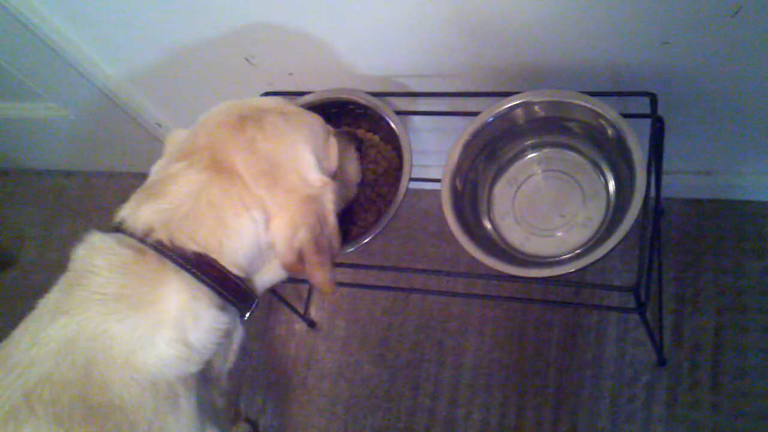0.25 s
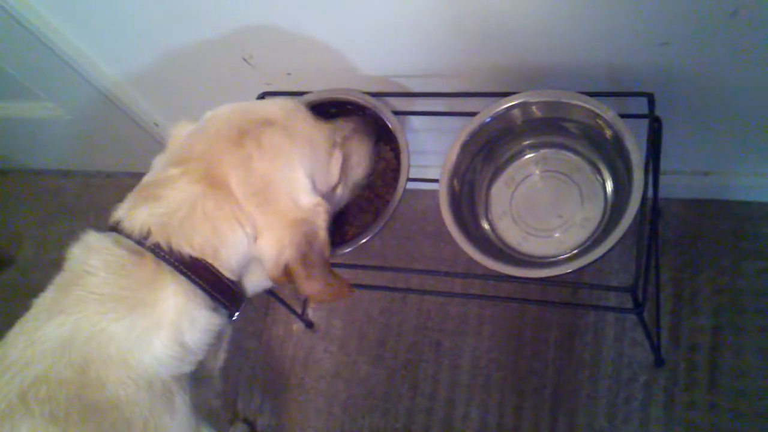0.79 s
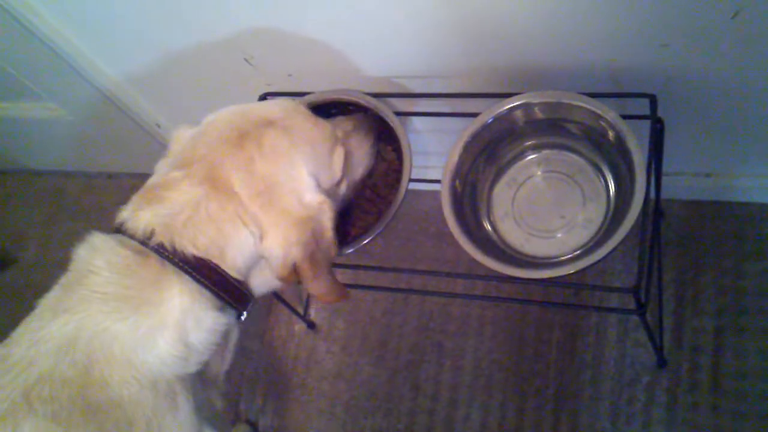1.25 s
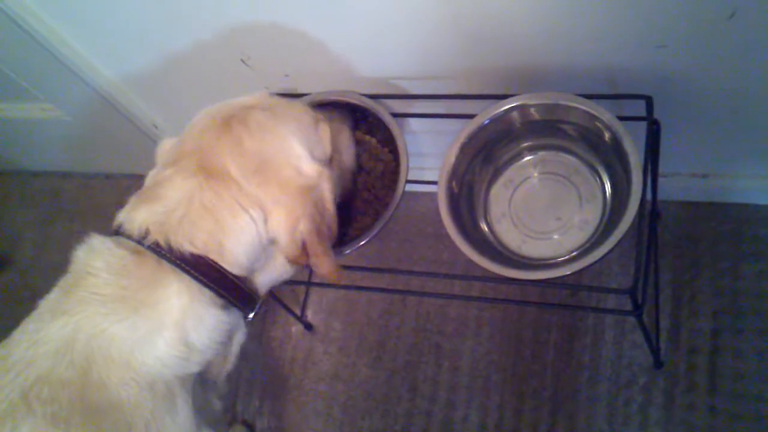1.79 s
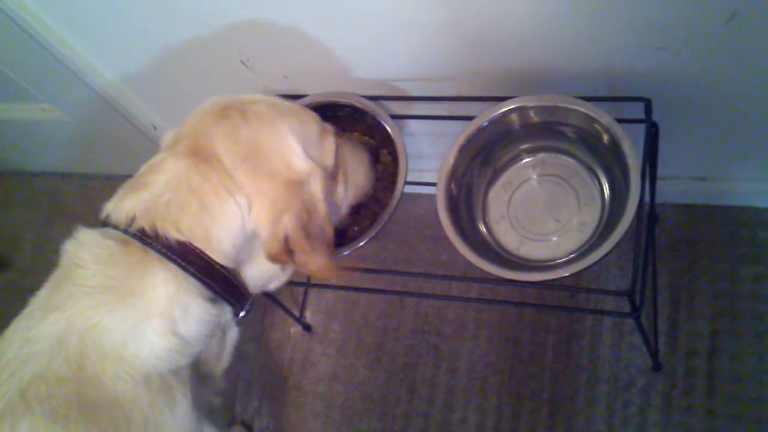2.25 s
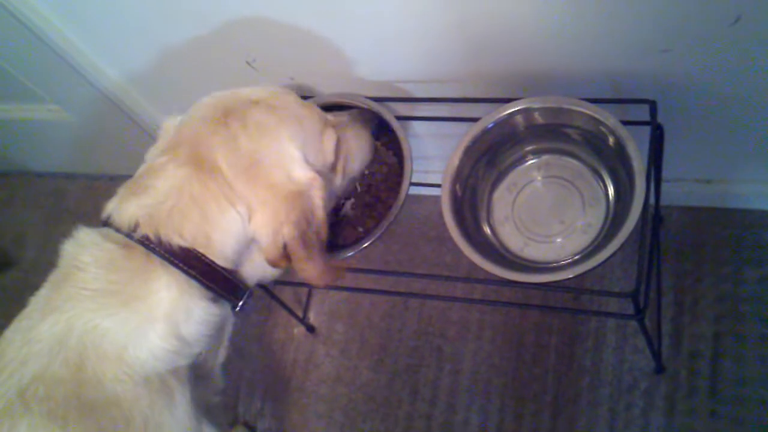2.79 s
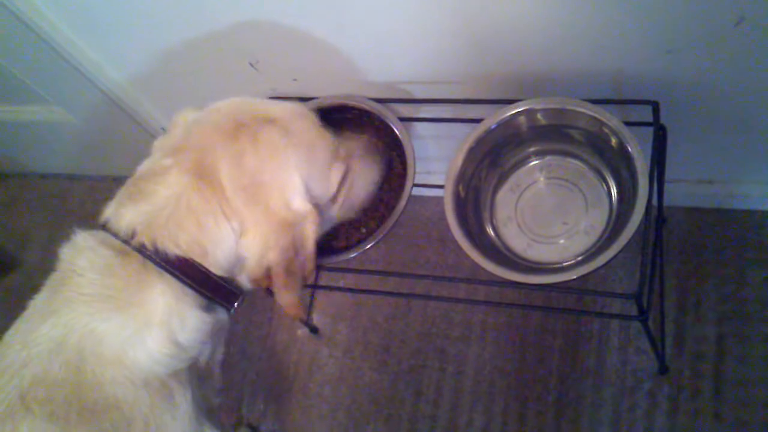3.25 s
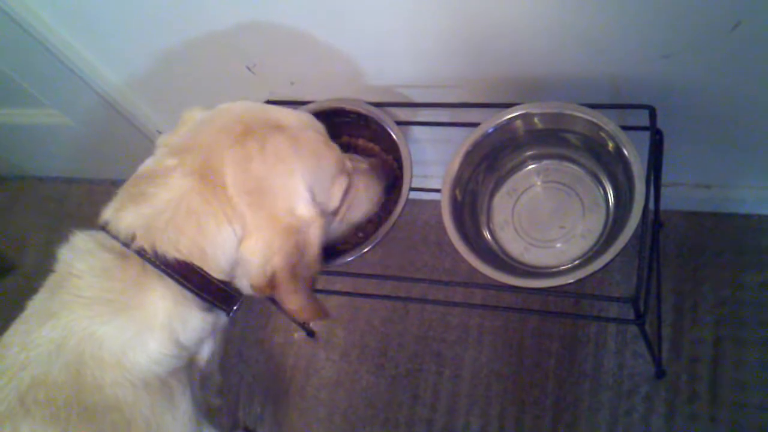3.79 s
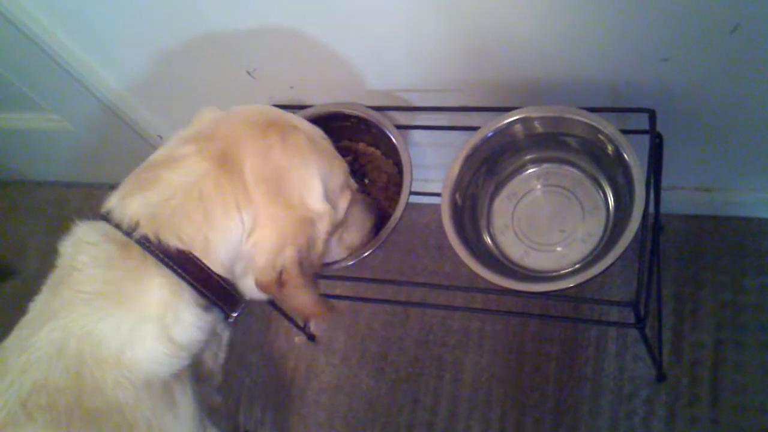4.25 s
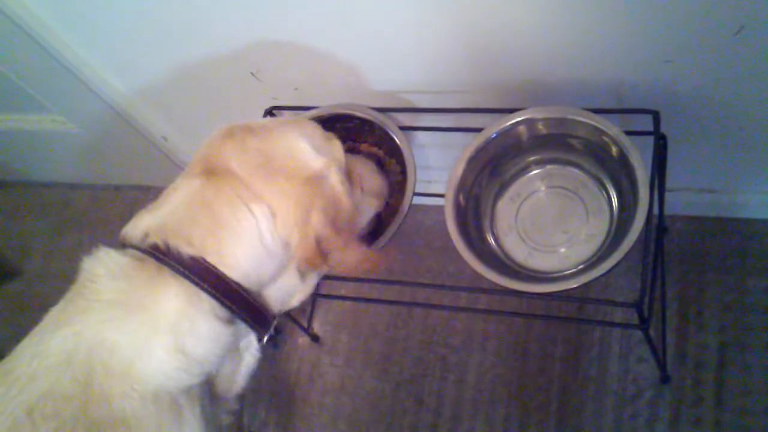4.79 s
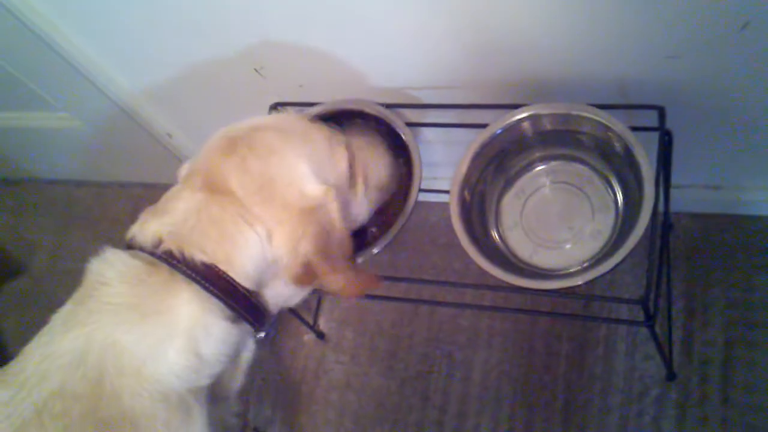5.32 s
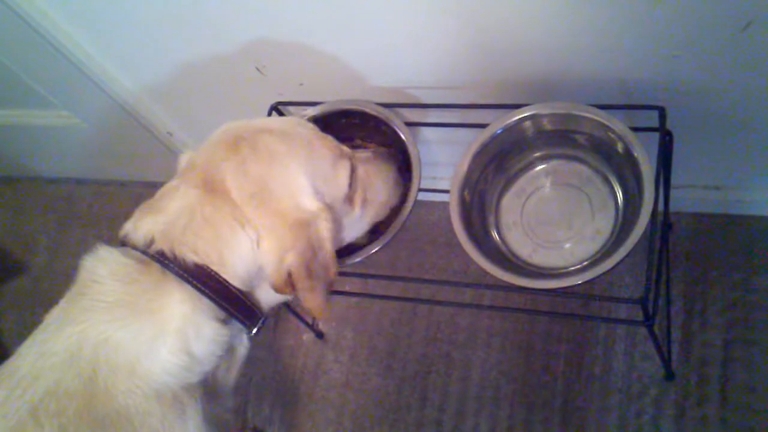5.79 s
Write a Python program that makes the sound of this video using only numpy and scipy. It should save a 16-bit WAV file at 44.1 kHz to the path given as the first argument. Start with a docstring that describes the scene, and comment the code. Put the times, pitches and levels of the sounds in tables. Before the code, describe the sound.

A dog crunches dry kibble from a steel bowl in irregular clacks, slows down, then digs in harder until the bowl clanks in its wire stand.

```python
"""Dry kibble clacks against a dog's teeth and a steel bowl, on carpet close to a wall.
Each clack is a short noise-like click with a spray of crumbling; random grains make the muzzle's stirring.
Decaying sines make the clops of the gulping mouth, the ring of the rim and the thuds of the wire stand;
hard shoves make the bowl clank. A small room answers over a faint hush, and two close microphone ports,
each minus the delayed other, pick it all up with some electronic hiss."""
import sys
import numpy as np
from scipy import signal
from scipy.fft import rfft, irfft, next_fast_len
from scipy.io import wavfile

SR = 44100
rng = np.random.default_rng(int(sys.argv[2]) if len(sys.argv) > 2 else 0)


def transcribe(u):
    """Save the signal u as a 16-bit wav file named by the first command-line argument.

    u: samples, shape (n,) or (channels, n), limited to [-1, 1]; the rate is SR.
    q: integer samples, one column per channel.
    """
    v = np.clip(np.atleast_2d(u).T, -1, 1)
    q = np.round(v * 32767).astype(np.int16)
    wavfile.write(sys.argv[1], SR, q)


N = 266805

SIZE = 16384  # samples in one single sound or response
T = np.arange(SIZE) / SR  # s
HZ = np.fft.rfftfreq(SIZE, 1 / SR)
LEAD = .005  # s from the start of a spray of contacts to its main one


def amp(db):
    """Decibels to gain."""
    return 10 ** (np.asarray(db) / 20)


def unit(x):
    """Scale to rms 1."""
    return x / np.sqrt(np.mean(x ** 2) + 1e-20)


def fade(t60, t=T):
    """Exponential decay that falls 60 dB in t60 seconds."""
    return np.exp(-np.log(1000) * t / np.maximum(t60, 1e-4))


def along(points, hz):
    """Interpolate (f/Hz, value) points on a log frequency axis."""
    f, v = np.transpose(points)
    return np.interp(np.log(hz + 1), np.log(f + 1), v)


def filtered(x, response):
    """Multiply the spectrum of x by a response of frequency."""
    m = next_fast_len(N + SIZE)
    spectrum = rfft(x, m) * response(np.fft.rfftfreq(m, 1 / SR))
    return irfft(spectrum, m)[..., :N]


def click(colour_db):
    """The most compact causal pulse with this spectrum: minimum phase, by folding the cepstrum."""
    cepstrum = irfft(np.log(amp(colour_db)))
    cepstrum[1:SIZE // 2] *= 2
    cepstrum[SIZE // 2 + 1:] = 0
    return irfft(np.exp(rfft(cepstrum)))


def through(x, response):
    """Convolution, cut to the length of x."""
    return signal.fftconvolve(np.atleast_2d(x), np.atleast_2d(response), axes=1)[:, :x.shape[-1]]


def add(track, s, sound):
    """Lay a sound into the track at time s."""
    start = max(round(s * SR), 0)
    track[:, start:start + SIZE] += sound[:, :max(N - start, 0)]


def clacks(lag_s=0.0015):
    """Pellets snap between the teeth and knock on the bowl: a dead contact amid a spray of crumbling."""
    # the loudest pellets hit by teeth and bowl, levels relative:
    # (t/s, level/dB, dull body/dB, sharp edge/dB, crumbling/dB)
    clack_events = [(.067, -28, 7.5, -9.5, -4.5), (.173, -31, -2, -11.5, 12), (.195, -31.5, 8, -5, 15),
                    (.291, -37, 0, -12.5, 11), (.341, -31, 1.5, -18.5, 0), (.387, -25.5, 15, -6, -7),
                    (.417, -26, 0, -11.5, -17), (.487, -31, -2.5, -16, 6), (.502, -32, 9.5, -4.5, -17),
                    (.537, -26.5, -5, -12, -12), (.597, -39.5, -5, -7, 1), (.65, -29.5, -9, -14.5, 6),
                    (.764, -38, -10, -19, -9), (.783, -36.5, 4, -24, -13), (.797, -31.5, -9, -18, 3),
                    (.84, -33.5, 0, -18, 15), (1.084, -34.5, 3, -24, 13), (1.146, -23.5, -5.5, -13.5, -3),
                    (1.174, -28, 17, -1, -2), (1.223, -27.5, -2.5, -12, -4), (1.251, -31.5, 7, -12, -3),
                    (1.373, -30.5, -12, -13.5, -10), (1.4, -36.5, 2, -30, -14), (1.582, -36, 2, -15.5, -6),
                    (1.792, -38, 3, -12.5, -4), (1.839, -34, -8, -17, -30), (1.954, -35.5, -29, -7, -12),
                    (2.047, -36, 1, -10, -5), (2.088, -30.5, -10.5, -11.5, -9), (2.155, -26, 6, -13, -2.5),
                    (2.188, -32, 3, -14, 4), (2.34, -36, 7, -7.5, -6), (2.384, -36.5, 5.5, -15, -11),
                    (2.497, -41, 8.5, -5, 2), (2.869, -43, -12, -12, 12), (2.889, -39.5, 4, -11.5, 5),
                    (3.027, -40, -14.5, -17.5, -15), (3.354, -44.5, 4, -32, 1), (3.439, -37, 8, -18.5, 23),
                    (3.764, -37, 7, -33, -6.5), (4.066, -39.5, -7, -12, -1),
                    (4.204, -35.5, -0.5, -12, -5.5), (4.247, -32.5, -11, -17.5, -10),
                    (4.391, -32, -2.5, -7, 2), (4.443, -31, 0, -30, 14), (4.464, -26.5, -4, -18, 5),
                    (4.484, -28.5, -13, -22, -8), (4.63, -30.5, -6, -16.5, 4), (4.699, -32.5, -1, -14, -16),
                    (4.746, -24, 0, -14, -0.5), (4.836, -29, -22, -10, -22), (4.955, -27.5, 2.5, -7, 3),
                    (5.013, -25, -2.5, -10, 3), (5.195, -23, -6.5, -8, 4.5), (5.286, -23.5, 5.5, -11, 13),
                    (5.315, -23.5, 3, -3, 0), (5.39, -35.5, -28, -11.5, -3), (5.477, -20.5, 1, -3, 0.5),
                    (5.554, -23.5, 11.5, -4.5, 2), (5.696, -36, 7, -15, -7), (5.895, -36.5, -5, -17, 13),
                    (5.913, -29.5, -4, -15.5, -10), (6.024, -35, -12, -17.5, -9)]
    track = np.zeros((2, N))
    for s, db, body_db, edge_db, crumble_db in clack_events:
        spray = crumble(rate=1200, t60=0.043, follow_db=crumble_db, build_t60=0.011)
        hit = through(spray, pellet(body_db, edge_db, uneven_db=2.0))
        hit = through(hit / np.linalg.norm(hit), space(room_db=-2.5, ring_db=-12.5))
        add(track, s + lag_s - LEAD, amp(db + 16.0) * hit)
    return track


def pellet(body_db, edge_db, uneven_db=3):
    """One dead contact: body below and edge above its clack, and broad random resonances of its own."""
    # spectrum of a pellet's contact before these changes: (f/Hz, relative level/dB)
    pellet_spectrum = [(30, -19.5), (100, -22.5), (200, -22), (330, -2), (550, 3.5), (1100, -3.5),
                       (2100, -4.5), (2900, 9.5), (3800, -2.5), (5200, -15), (7200, -7), (9000, -10.5),
                       (14000, -22.5)]
    tone = np.interp(np.log(HZ + 1), np.log([530, 1290, 2105, 3040]), [body_db, 0, 0, edge_db])
    own = np.interp(HZ, np.linspace(0, SR / 2, 70), rng.standard_normal(70))
    return click(along(pellet_spectrum, HZ) + tone + uneven_db * own)


def crumble(rate, t60, follow_db, build_t60):
    """A spray of small contacts, rate per second, that builds up to the main one and dies away."""
    envelope = fade(np.where(T < LEAD, build_t60, t60), np.abs(T - LEAD))
    spray = (rng.random(SIZE) < rate / SR) * rng.standard_normal(SIZE) * envelope
    spray *= amp(follow_db) / (np.linalg.norm(spray) + 1e-9)
    spray[round(LEAD * SR)] += 1  # the main contact
    return spray


def stirring(count=8):
    """Pellets tumble over each other and scrape the steel as the muzzle digs: random grains of contact."""
    # digs of the muzzle into the pellets, about four a second:
    # (t/s at the height, length/s, tumbling level/dB, scraping level/dB)
    muzzle_digs = [(-0.007, 0.085, -45, -59.5), (0.217, 0.078, -60, -66.5), (0.38, 0.19, -55.5, -63.5),
                   (0.597, 0.039, -59, -59), (0.691, 0.11, -46.5, -67), (1.104, 0.17, -47, -70),
                   (1.466, 0.21, -56, -67), (2.122, 0.26, -48.5, -72), (2.356, 0.14, -65, -74),
                   (2.638, 0.029, -58, -85), (2.94, 0.091, -54, -79), (3.288, 0.19, -60, -71),
                   (3.914, 0.16, -65.5, -69), (4.101, 0.078, -48, -60.5), (4.232, 0.11, -48.5, -60),
                   (4.385, 0.082, -47, -56.5), (4.486, 0.052, -45.5, -49.5), (4.645, 0.18, -47.5, -59),
                   (5, 0.36, -50.5, -63), (5.23, 0.083, -42.5, -49), (5.434, 0.11, -48.5, -52.5),
                   (5.565, 0.12, -48.5, -54), (5.876, 0.23, -57.5, -75)]
    # spectrum of a pellet scraping on steel: (f/Hz, relative level/dB)
    scrape_spectrum = [(1500, -19), (3300, -4), (5200, -19), (7100, -5.5), (8800, -2), (10500, -14.5),
                       (14000, -13)]
    settling_db = -66.5  # pellets keep settling under and between the digs
    tumble, scrape = amp(settling_db), 0
    for s, length, tumble_db, scrape_db in muzzle_digs:
        push = swell(s, length)
        tumble = tumble + amp(tumble_db) * push
        scrape = scrape + amp(scrape_db) * push
    track = np.zeros((2, N))
    for _ in range(count):  # each pass has its own pellet and its own spot in the bowl
        knock = through(pellet(body_db=0.6, edge_db=-15.5, uneven_db=0.5), space(room_db=-0.5, ring_db=-17.0))
        tumbling = tumble * grains(rate=30, spread_db=4.5)
        track += through(tumbling, knock / np.linalg.norm(knock[0]))
        # the scrape reaches the ports almost wholly as diffuse room sound
        tick = through(click(along(scrape_spectrum, HZ)), space(room_db=43.0, ring_db=-26))
        scraping = scrape * grains(rate=81, spread_db=6)
        track += through(scraping, tick / np.linalg.norm(tick[0]))
    return track / np.sqrt(count)


def swell(s, length):
    """The push of one dig: a bell curve with its height at time s, easing off slightly faster than it grows."""
    since = np.arange(N) / SR - s
    width = length * np.where(since < 0, 1, 0.95)
    return np.exp(-(2 * since / width) ** 2)


def grains(rate, spread_db):
    """Random contacts, rate per second, mostly small and a few large, at rms 1."""
    sizes = amp(spread_db * np.minimum(rng.exponential(size=N), 3)) * rng.choice([-1, 1], N)
    return unit((rng.random(N) < rate / SR) * sizes)


def clops(t60=0.039, rise=0.004, lag_s=0.00086):
    """The closing mouth rings briefly like a small cavity: one quickly decaying sine."""
    # hollow clops of the mouth: (t/s, relative level/dB, f/Hz)
    clop_events = [(0.837, -31.5, 426), (2.383, -30.5, 592), (3.145, -37.5, 391), (3.322, -35.5, 460),
                   (3.404, -30.5, 394), (3.438, -37, 324), (3.485, -36, 350), (5.625, -27.5, 536)]
    track = np.zeros((2, N))
    for s, db, hz in clop_events:
        pop = np.sin(2 * np.pi * hz * T) * fade(t60) * (1 - fade(rise))
        placed = through(pop / pop.max(), space(room_db=-6.5, ring_db=-25.0, wall_db=-5))
        add(track, s + lag_s, amp(db - 7) * placed)
    return track


def clanks(lag_s=0.00081, rim_t60=0.21, detune=0.0023):
    """Steel chatters on wire for a moment and the rim rings on, a little differently at each touch."""
    # the bowl rattling in its stand: (t/s, relative level/dB, relative low ring/dB)
    clank_events = [(1.006, -53.5, -13), (1.146, -43, -10), (1.956, -42, -21), (3.567, -48, -18),
                    (4.391, -36.5, -36), (4.747, -40.5, -18), (4.955, -36.5, -26), (5.195, -22, 1),
                    (5.288, -22, -9), (5.475, -22, -12), (5.556, -23, -10), (5.696, -34, -0.5),
                    (5.913, -49.5, -11)]
    # spectrum of one contact of steel on wire: (f/Hz, relative level/dB)
    chatter_spectrum = [(300, -36), (1500, -36), (2200, 6), (3300, 8.5), (4000, -13), (5100, -30.5),
                        (6000, -3.5), (6800, -3.5), (7400, 4.5), (8650, 5), (10200, -9), (11600, -2.5),
                        (14000, -30)]
    # high modes of the bowl's rim: (f/Hz, relative level/dB)
    rim_modes = [(2942, -57), (3372, -43), (6228, -70), (6842, -51.5), (7241, -64), (7951, -70),
                 (8398, -44), (8699, -56)]
    track = np.zeros((2, N))
    below = along([(4000, 1), (6000, 0)], HZ)  # where the low ring acts on the chatter
    for s, db, low_db in clank_events:
        contact = click(along(chatter_spectrum, HZ) + (low_db + 5.5) * below)
        hit = through(crumble(rate=5000, t60=0.023, follow_db=12, build_t60=0.0033), contact)
        hit = through(hit, space(room_db=2.5, ring_db=-12))
        ring = np.zeros((2, SIZE))
        for hz, level in rim_modes:
            turns = hz * rng.normal(1, detune) * T + rng.random((2, 1))  # own phase at each port
            gain = amp(level + (low_db + 6.5) * (hz < 5000))
            ring += gain * np.sin(2 * np.pi * turns) * fade(rim_t60)
        add(track, s + lag_s - LEAD, amp(db + 21.0) * hit / np.linalg.norm(hit[0]))
        add(track, s + lag_s, amp(db + 12.5) * ring / np.linalg.norm(ring[0]))
    return track


def bumps(rise=0.0059, wire_hz=291, wire_t60=0.75):
    """A shove thuds through the stand into the carpet and leaves the wire frame humming: decaying sines."""
    # the stand bumping on the carpet: (t/s, relative level/dB, relative wire ring/dB)
    bump_events = [(.840, -46, -9), (1.148, -56.5, -9), (1.255, -54, -8), (5.195, -51, 3),
                   (5.288, -48, 3.5), (5.475, -52, -4), (5.555, -50, -2.5)]
    # modes of the stand on the carpet: (f/Hz, relative level/dB, t60/s)
    thud_modes = [(135, -13.5, 0.16), (186, 2, 0.087)]
    track = np.zeros((2, N))
    for s, db, wire_db in bump_events:
        thud = sum(amp(level) * np.sin(2 * np.pi * hz * T) * fade(t60) for hz, level, t60 in thud_modes)
        thud += amp(wire_db - 8) * np.sin(2 * np.pi * wire_hz * T) * fade(wire_t60)
        placed = through(thud * (1 - fade(rise)), space(room_db=-6, ring_db=-32))
        add(track, s, amp(db + 1.0) * placed)
    return track


def space(room_db, ring_db, wall_db=-8, wall_s=.0066, ring_t60=0.18):
    """Response at both ports to one spot in the bowl: direct sound, wall echo, bowl ring and room tail."""
    # decay of the small room: (f/Hz, t60/s)
    room_decay = [(200, 0.32), (600, 0.16), (1500, 0.31), (3700, 0.23), (10000, 0.14)]
    # low modes of the loaded bowl: (f/Hz, relative level/dB)
    bowl_modes = [(463.0, -59.5), (586.8, -59.5), (672.9, -97), (786.0, -55.5), (888.2, -61.5), (1071, -57),
                  (1147, -67), (1610, -66), (1685, -53.5), (1825, -56.5), (1965, -60), (2180, -53)]
    hz, t, noise = signal.stft(pair(SIZE), SR, nperseg=256)
    decaying = noise * fade(along(room_decay, hz)[:, None], t)
    tail = signal.istft(decaying, SR, nperseg=256)[1][:, :SIZE] * (1 - fade(0.0022))
    mode_hz, mode_db = np.transpose(bowl_modes)
    strength = amp(mode_db + rng.normal(0, 1.3, len(bowl_modes)))  # each spot excites the modes differently
    turns = mode_hz[:, None] * T + rng.random((len(bowl_modes), 1))
    ring = strength @ np.sin(2 * np.pi * turns) * fade(ring_t60)
    near = amp(ring_db) * ring / np.linalg.norm(ring)
    near[0] += 1  # direct sound
    near[round(wall_s * SR)] += amp(wall_db)
    # the bowl is left of centre, so the right port hears it a few samples later
    late = rng.integers(2, 5)
    return np.array([near, np.roll(near, late)]) + amp(room_db) * tail / np.linalg.norm(tail[0])


def pair(length, alike=1, spread_s=0.0004):
    """Diffuse noise at two close ports: most alike in the bass, unrelated in the treble."""
    likeness = np.clip(alike * np.sinc(2 * spread_s * np.fft.rfftfreq(length, 1 / SR)), -1, 1)
    spectra = rfft(rng.standard_normal((2, length))) * np.sqrt([1 + likeness, 1 - likeness])
    shared, own = irfft(spectra, length)
    return unit(np.array([shared + own, shared - own]))


def hush():
    """Low murmur of the house's air and a thin hiss: steady filtered noise."""
    # spectrum of the quiet room: (f/Hz, relative level/dB per Hz)
    hush_spectrum = [(25, -33), (50, -27), (80, -4.5), (130, 1), (300, -3), (550, -4.5), (900, -19.5),
                     (1300, -26), (1900, -46), (3000, -15.5), (5400, -29), (8000, -57), (14000, -22)]
    return amp(-64) * unit(filtered(pair(N, alike=0.16), lambda hz: amp(along(hush_spectrum, hz))))


def scene():
    """Everything at the bowl, over the quiet room."""
    return clacks() + stirring() + clops() + clanks() + bumps() + hush()


def record(dry):
    """Each channel is one port minus the delayed other one; then the tone curve, hiss and band limit."""
    # tone of the microphone, bass lifted and middle lowered: (f/Hz, gain/dB)
    mic_curve = [(40, 0), (125, 3), (250, 3.5), (500, -2), (1000, -4.5), (1400, -4), (2100, -3),
                 (2700, -6.5), (4000, -3), (14000, -0.5)]
    # spectrum of the electronic hiss: (f/Hz, relative level/dB per Hz)
    hiss_spectrum = [(1500, -63), (3000, -12), (5400, 1), (8000, 7), (14000, 5)]
    port_lag, top_hz = .00038, 13950  # s, Hz
    channels = dry - filtered(dry[::-1], lambda hz: np.exp(-2j * np.pi * hz * port_lag))
    channels = filtered(channels, lambda hz: amp(along(mic_curve, hz)))
    noise = rng.standard_normal((2, N))
    hiss = amp(-68.5) * unit(filtered(noise, lambda hz: amp(along(hiss_spectrum, hz))))
    return filtered(channels + hiss, lambda hz: 1 / np.sqrt(1 + (hz / top_hz) ** 300))


dry = scene()
out = record(dry)
transcribe(out)
```